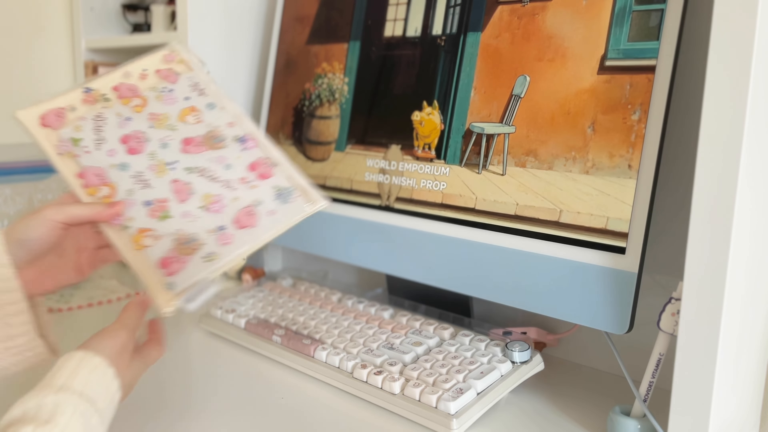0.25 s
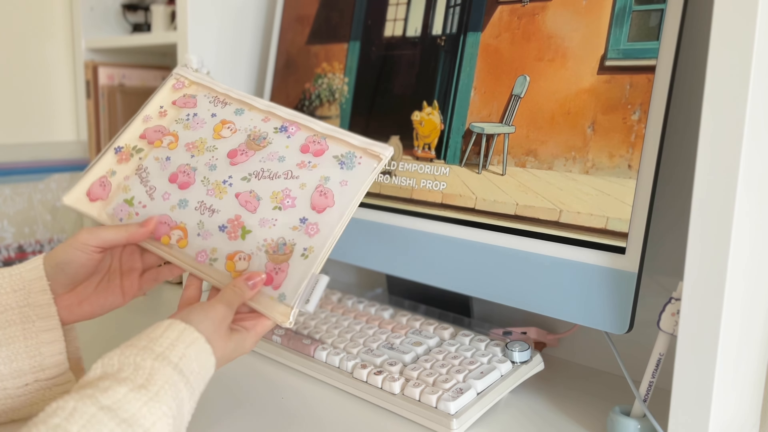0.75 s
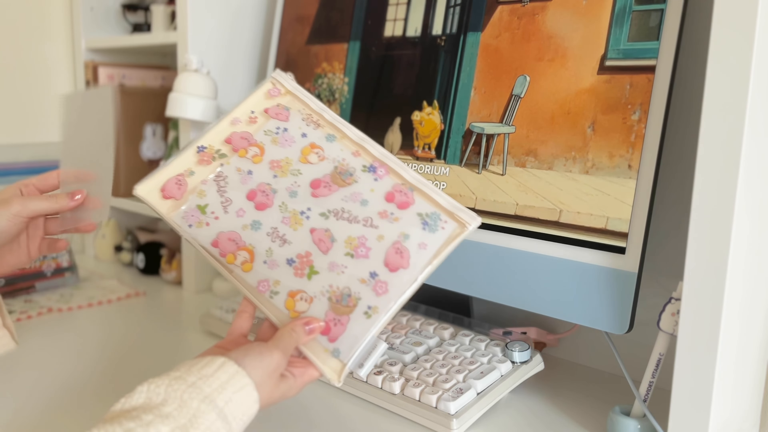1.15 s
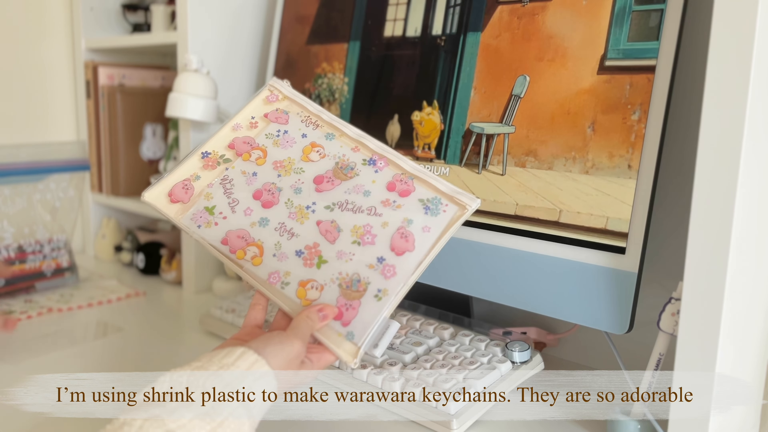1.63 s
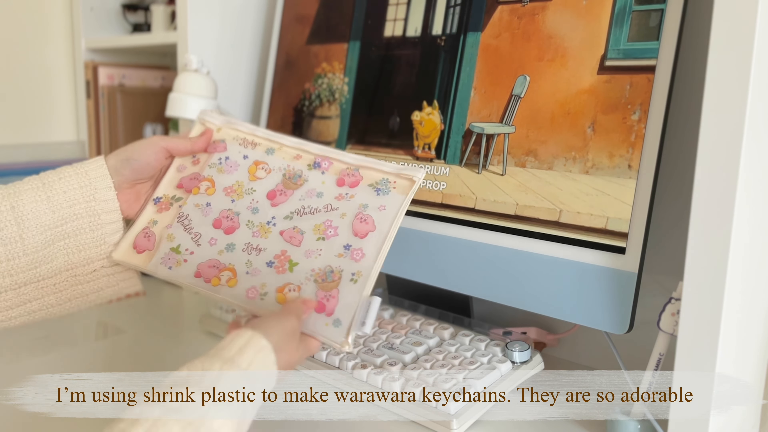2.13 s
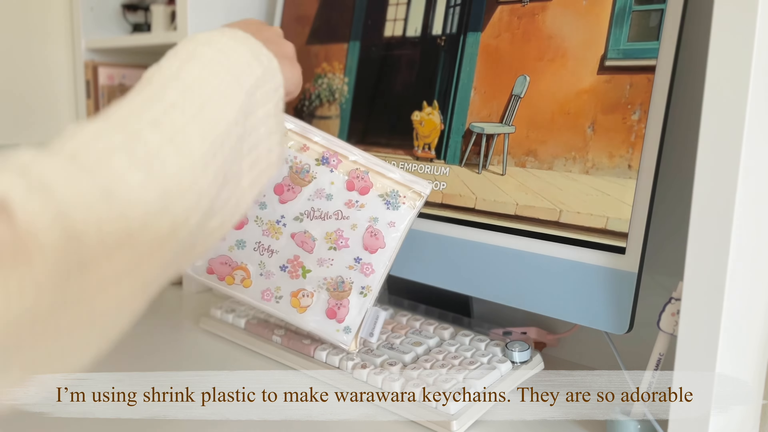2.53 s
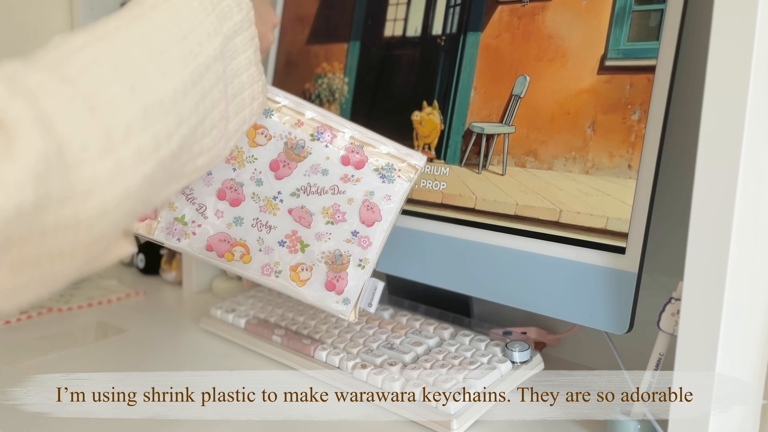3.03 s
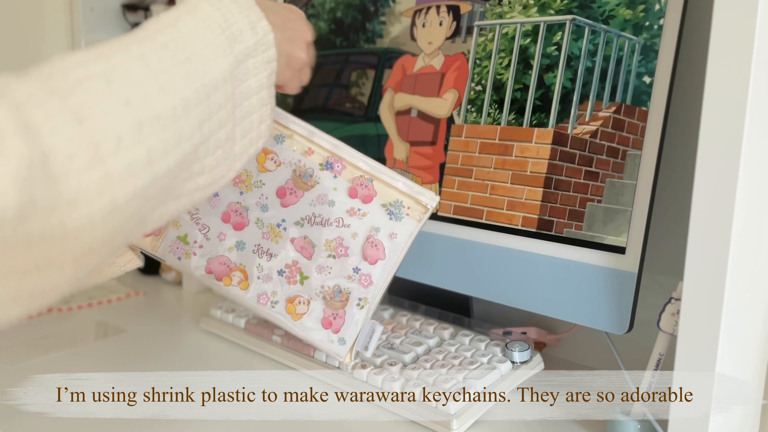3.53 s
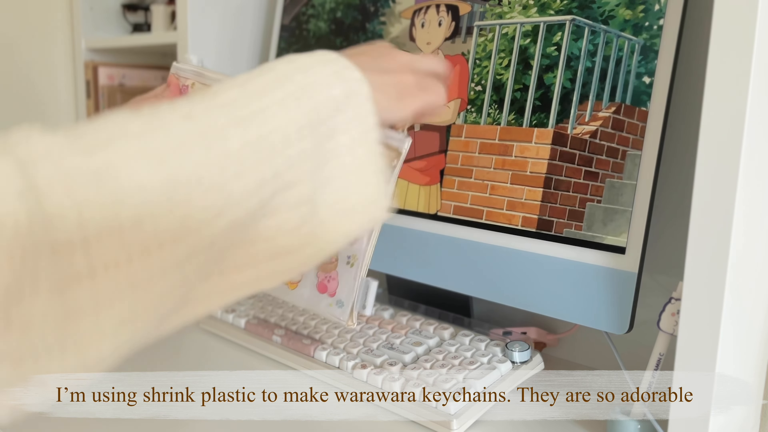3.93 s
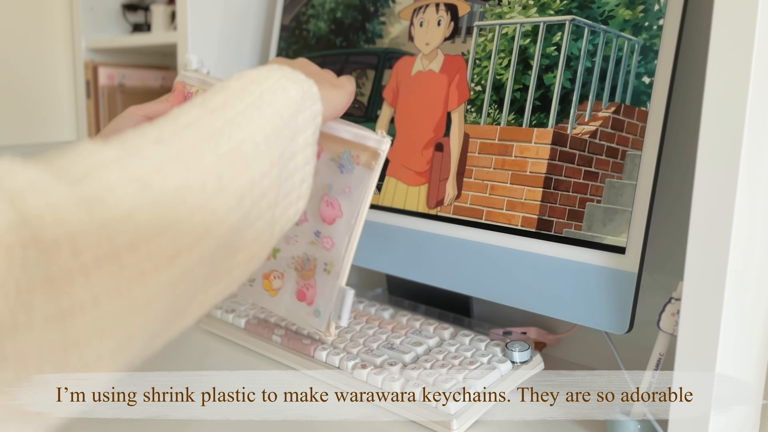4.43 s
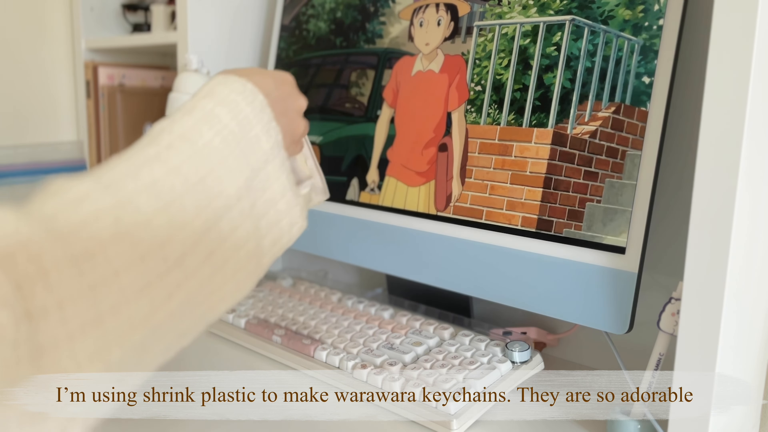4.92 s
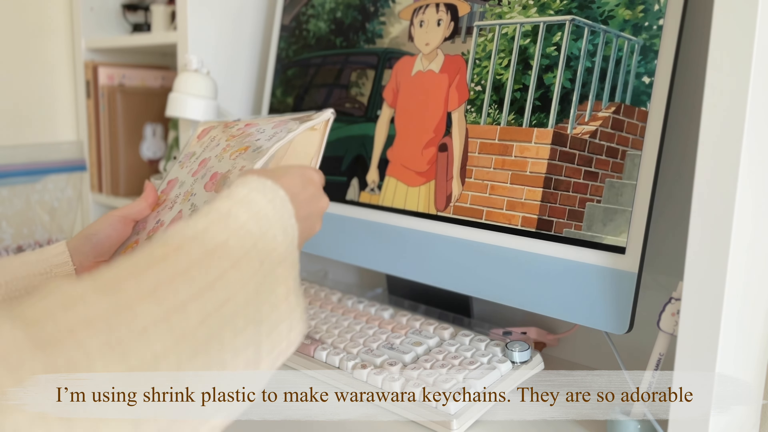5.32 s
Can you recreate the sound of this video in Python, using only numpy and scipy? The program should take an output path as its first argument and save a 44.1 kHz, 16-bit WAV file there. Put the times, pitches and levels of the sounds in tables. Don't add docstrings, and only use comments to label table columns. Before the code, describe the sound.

Crackly plastic film is turned and flexed, a dull desk knock lands, a quick zip rips, and rustling continues over faint room hum.

```python
import sys
import numpy as np
from scipy import signal
from scipy.fft import rfft, irfft, next_fast_len
from scipy.io import wavfile
from scipy.ndimage import uniform_filter1d, map_coordinates

SR = 44100
rng = np.random.default_rng(int(sys.argv[2]) if len(sys.argv) > 2 else 0)


def to_linear_factor(level_db):
    exponent = np.asarray(level_db, float) / 20
    return 10 ** exponent


def int16_out(signal):
    q = np.round(np.clip(np.atleast_2d(signal).T, -1, 1) * 32767)
    wavfile.write(sys.argv[1], SR, q.astype(np.int16))


N = 245637

# (frequency [Hz], level [dB])
FILM_SPECTRUM = [(1100, -120), (1500, -6.5), (2000, -2), (3200, -1.5), (4300, -3.5), (5300, -2),
                 (7000, -2.5), (8000, -7), (9500, -120)]
# (frequency [Hz], level [dB])
AIRY_SPECTRUM = [(6000, -120), (7000, -14), (8300, -3), (10000, 0), (12000, -2), (14000, -3), (15600, -7),
                 (17000, -40)]
# (frequency [Hz], level [dB])
BODY_SPECTRUM = [(300, -120), (420, 0.5), (700, -0.5), (1050, 3), (1500, 3), (2000, -8.5), (3000, -22),
                 (4500, -120)]


def film():
    # (start [s], swell [s], fade per 20 dB [s], peak level [dB], airy top re peak [dB])
    slides = [(0.0, 0.0039, 0.34, -64.5, -11), (.15, 0.28, 3.5, -75, -7), (.46, 0.02, 0.13, -63, -13),
              (.53, 0.28, 0.26, -54, -5.5), (.84, 0.12, 0.1, -64, 6), (.985, 0.029, 0.05, -57, 6),
              (1.1, 0.05, 0.17, -75.5, 0.5), (1.44, 0.042, 0.1141, -40, -9), (1.85, 0.092, 1, -84, -9.5),
              (1.997, 0.0053, 0.094, -51.5, -10.5), (2.04, 0.052, 0.11, -47, -11),
              (2.12, 0.046, 0.0843, -54, -5.5), (2.25, .01, 0.08, -62, -7),
              (2.385, 0.029, 0.1, -61.5, -9.5), (2.595, 0.048, 0.26, -73, -12), (2.72, 0.1, 0, -69.5, -7),
              (3.003, 0.0066, 0.1, -75.5, -5),
              (3.335, 0.04, 0.08, -62.5, -12), (3.7, 0.091, 0.08, -63, -15),
               (3.902, 0.018, 0.11, -52, -16.5), (3.97, 0.054, 0.13, -62, -10.5),
               (4.14, 0.017, -0.2, -69, -18), (4.221, 0.062, 0.1, -53, -14.5),
               (4.479, 0.25, .09, -52, -8.5), (4.8, 0.016, 0.05, -54, -2), (4.931, 0.016, 0.38, -50.5, -11),
               (5.07, 0.0076, 0.18, -48, -12), (5.26, 0.22, -1, -59.5, -9), (5.51, 0.038, -6, -41, -8)]
    # (start [s], swell [s], fade per 20 dB [s], flap level [dB], body re flap [dB])
    flexes = [(0.0, 0.0047, 1, -71.5, 4), (.3, 0.14, 0.4, -68, -2.5), (.47, 0.028, 0.1, -63, 1.5),
              (.6, 0.15, 0.19, -67, 5.5), (.99, 0.024, .5, -67, -24), (1.435, 0.033, 0.08, -41, -12),
              (1.99, 0.0066, 0.5, -63, -0.5), (2.05, 0.059, 0.19, -67, 9.5),
              (2.355, 0.016, 0.1656, -42.5, -6.5), (2.62, 0.19, 0.24, -82, 11.5),
              (3.005, 0.0056, -0.03, -54.5, -7), (3.34, 0.029, 0.4, -58.5, 0.5),
              (3.475, 0.051, 0.32, -52, 1.5), (3.6, 0.17, 0.2, -66.5, 8), (3.97, 0.055, 0.13, -66, 2.5),
              (4.14, 0.011, 0.1, -75, 12), (4.22, .03, 0.3, -61, 0.5), (4.47, 0.22, 0.65, -63.5, 4),
              (4.55, 0.012, 0.1, -57, -3), (4.8, 0.017, 0.03, -60.5, 7), (4.93, 0.026, 0.2, -50.5, -7),
              (5.0, 0.053, 0.26, -68, 12), (5.25, 0.069, 0.5, -62, -0.5), (5.51, 0.044, -0.5, -65.5, 13.5)]
    # (frequency [Hz], level [dB])
    flap_spectrum = [(50, -120), (90, -4.5), (130, 0), (250, -1), (400, -7.5), (550, -120)]
    slide_db, airy_db = strokes(slides, rest_db=[-99, -111], steeper=1.09)
    flap_db, body_db = strokes(flexes, rest_db=[-83.5, -79], steeper=1.21)

    slips = (rng.random(N) < 60 / SR) * rng.exponential(1.6, N)
    fading = signal.lfilter([1], [1, -np.exp(-1 / (0.007 * SR))], slips)
    surge = to_linear_factor(2.85 * wobble(35)) * np.sqrt(1 + fading)
    rub = surge * rng.standard_normal((2, N))
    buckles = crackle(count=3000, centre_hz=4480, spread=0.7, cycles=1.9, scatter_db=2.8)
    grit = unit(rub) + 0.51 * scattered(buckles)

    hiss = to_linear_factor(slide_db - 4) * coloured(patchy(grit, depth_db=1.5), FILM_SPECTRUM)
    airy = to_linear_factor(airy_db + 3) * coloured(grit, AIRY_SPECTRUM)
    body_gain = np.hypot(to_linear_factor(body_db + 3.5), to_linear_factor(slide_db - 14))
    body = body_gain * coloured(rub, BODY_SPECTRUM)
    flutter = to_linear_factor(3.65 * wobble(25)) * rng.standard_normal((2, N))
    flap = to_linear_factor(flap_db - 3) * coloured(flutter, flap_spectrum)
    return hiss + airy + body + flap


def strokes(rows, rest_db, steeper):
    touch_s, swell_db = 0.028, 7.5
    t = np.arange(0, N + 32, 32) / SR
    power = to_linear_factor(2 * np.array(rest_db))[:, None] * np.ones(len(t))
    for s, swell, fade, db, other_db in rows:
        corners = np.cumsum([s - touch_s, touch_s, abs(swell), 4 * abs(fade)])
        shape_db = np.interp(t, corners, [-80, -swell_db, 0, -80])
        power = power + to_linear_factor(2 * np.array([db + shape_db, db + other_db + steeper * shape_db]))
    return [np.interp(np.arange(N) / SR, t, 10 * np.log10(p)) for p in power]


def crackle(count, centre_hz, spread, cycles, scatter_db):
    draw = rng.random((count, 2))
    hz = centre_hz * np.exp(spread * rng.standard_normal(count))
    hz = np.clip(hz, 300, 15000)[:, None]
    t = np.arange(300) / SR
    size = to_linear_factor(-scatter_db * np.log(draw[:, :1] + 1e-4))
    rings = size * np.sin(2 * np.pi * hz * t) * np.exp(-t * hz / cycles)
    at = (draw[:, 1:] * N).astype(int) + np.arange(len(t))
    return unit(np.bincount(at.ravel(), rings.ravel(), N + len(t))[:N])


def patchy(x, depth_db):
    z = signal.stft(x, nperseg=256)[2]
    field = uniform_filter1d(rng.standard_normal(z.shape[1:]), size=4, axis=0)
    field = uniform_filter1d(field, size=14, axis=1)
    return signal.istft(z * to_linear_factor(depth_db * unit(field)), nperseg=256)[1][:, :N]


def snaps():
    # (time [s], peak level [dB], ring frequency [Hz])
    crisp = [(.0608, -43.5, 2460), (.1446, -49, 2910), (.16, -45.5, 1940), (.301, -47.5, 1760),
             (.4815, -38.5, 2500), (.5781, -49, 2720), (.955, -47, 6250), (.989, -39, 6640),
             (1.4703, -24, 2460), (1.4897, -29, 3760), (1.9949, -45.5, 1930), (2.0772, -39, 2600),
             (3.76, -37, 1932), (4.5946, -46, 4910), (4.6242, -34, 2900), (4.7087, -32.5, 2800),
             (5.0788, -31.5, 2420), (5.0922, -30.5, 1760), (5.1217, -38.5, 2510), (5.5066, -38, 1800)]
    # (time [s], peak level [dB], ring frequency [Hz])
    soft = [(1.6557, -46, 2410), (1.8945, -50.5, 3270), (2.0182, -38.5, 3330), (2.0512, -41, 1820),
            (2.1265, -32, 2530), (2.2564, -32, 4980), (2.3014, -48.5, 2700), (2.597, -47.5, 2620),
            (2.7008, -51.5, 1920), (3.8753, -43, 3270), (3.9085, -39.5, 3250), (4.2163, -52, 2950),
            (4.2386, -37, 1950), (4.0147, -37, 1960), (4.449, -40.5, 3030), (4.4936, -36.5, 2645),
            (4.8427, -42.5, 1960), (5.2654, -39, 2280), (5.276, -42.5, 2100), (5.5487, -34, 2750)]
    # (time [s], peak level [dB], ring frequency [Hz])
    seam = [(.4339, -43.5, 2370), (1.4199, -37, 2200), (1.4371, -37, 1760), (1.4462, -36, 1760),
            (2.0647, -34, 2620), (2.3575, -34.5, 2390), (2.627, -47.5, 1970), (2.786, -48.5, 2220),
            (3.336, -43, 2380), (3.3538, -42, 1680), (4.8124, -40.5, 2920), (4.9293, -44, 2425),
            (5.036, -41, 2250), (5.3988, -43, 2520)]
    # (time [s], peak level [dB], ring frequency [Hz])
    padded = [(2.1044, -31, 1940), (2.3813, -25, 1960), (2.4353, -41.5, 1880), (2.739, -53, 1760),
              (2.9297, -59, 1860), (3.0147, -42, 1820), (3.2894, -58, 1900), (4.1365, -59, 1810),
              (4.15, -41.5, 2580), (4.4, -63, 2300), (4.552, -34.5, 1760)]
    # (time [s], peak level [dB], ring frequency [Hz])
    settling = [(.005, -54, 2700), (.2174, -59, 1860), (.3909, -61, 2420), (.789, -50, 2700),
                (1.075, -56, 2900), (1.1814, -58, 2700), (2.146, -44, 5500), (2.162, -46, 4500),
                (2.178, -44, 2000), (2.33, -54, 3500), (2.5486, -62, 3690), (2.618, -50, 6260),
                (2.6444, -53, 3000), (2.6718, -54, 5500), (2.8414, -61, 4000), (3.2214, -70, 1690),
                (3.8294, -55, 3700), (3.9292, -45, 3220), (3.98, -50, 3800), (4.4104, -56, 1856),
                (4.457, -52, 5300), (4.4872, -43, 1900), (4.5054, -39, 2600), (4.5393, -41, 5200),
                (4.6974, -40, 2570), (4.7424, -41, 2800), (4.8054, -42, 6000), (4.945, -45, 5500)]
    # (creases, airy top [dB], body [dB], t60 at 2500 Hz [s])
    kinds = [(crisp, -9.5, -23, 0.02), (soft, -23.5, -22, 0.019), (seam, -14, -1.1, 0.019),
             (padded, -35, 0.84, 0.019), (settling, -16, -11, 0.016)]

    crack, airy, body = np.zeros((3, N + SR))
    t = np.arange(SR // 16) / SR
    for creases, airy_db, body_db, t60 in kinds:
        for s, db, hz in creases:
            decay_db = 60 * t / t60 * (hz / 2500) ** 0.52
            fade = to_linear_factor(db - decay_db) * (1 - np.exp(-t / 0.00044))
            burst = rng.standard_normal((3, len(t)))
            ring = 0.7 * np.sin(2 * np.pi * hz * t + 0.3 * np.cumsum(burst[2]))
            onset = 0.58 + 0.99 * np.exp(-t / 0.00049)
            at = slice(round(s * SR), round(s * SR) + len(t))
            crack[at] += fade * (0.96 * ring + onset * to_linear_factor(0.56 * (airy_db + 12)) * burst[0])
            airy[at] += fade * to_linear_factor(airy_db) * burst[0]
            body[at] += fade * to_linear_factor(body_db) * burst[1]

    def shaped(x, spectrum, gain_db):
        return filtered(x[:N], lambda hz: to_linear_factor(gain_db + along(spectrum, hz)))

    return shaped(crack, FILM_SPECTRUM, 0.2) + shaped(airy, AIRY_SPECTRUM, 9) + shaped(body, BODY_SPECTRUM, 5)


def zip_pull():
    # (time [s], tooth rate [1/s], level [dB])
    short_pull = [
        (3.35, 202, -96),
        (3.358, 207, -50.5),
        (3.406, 170, -48.5),
        (3.42, 144, -93),
    ]
    # (time [s], tooth rate [1/s], level [dB])
    long_pull = [
        (3.476, 500, -93),
        (3.484, 500, -56),
        (3.55, 880, -44),
        (3.603, 904.5, -42),
        (3.628, 1035, -40),
        (3.648, 1073, -34),
        (3.697, 854.4, -35),
        (3.745, 812, -51),
        (3.86, 800, -75),
    ]
    # (time [s], peak level [dB])
    first_teeth = [(3.4798, -44), (3.488, -50), (3.495, -47), (3.5002, -44), (3.507, -48), (3.514, -43),
                   (3.521, -47), (3.5262, -41), (3.531, -41), (3.5351, -39), (3.539, -40), (3.543, -40)]
    # (frequency [Hz], width [Hz], level [dB])
    slider = [(550, 280, -3.5), (950, 370, 2), (1710, 50, 13), (2000, 450, 3), (3250, 500, 0),
              (4100, 220, -4), (5300, 1700, -10), (11000, 8300, -14)]
    rate, level_db = curves(short_pull + long_pull + [(3.88, 800, -99)])

    trembling = 1 + 0.015 * wobble(70)
    at = np.flatnonzero(np.diff(np.floor(np.cumsum(rate * trembling) / SR)))
    draw = rng.standard_normal((2, N))
    weakness_db = np.clip(-1.6 * (level_db[at] + 36), 0, 11)
    uneven = (0.012 + 12 / rate[at]) * to_linear_factor(weakness_db)
    moved = np.clip(at + uneven * draw[0, at] * SR / rate[at], 0, N - 2)
    size = to_linear_factor(1.9 * draw[1, at]) * np.sqrt(SR / rate[at])
    whole, part = moved.astype(int), moved % 1
    ticks = np.bincount(whole, size * (1 - part), N) + np.bincount(whole + 1, size * part, N)

    scrape_db = -0.5 - 1.36 * (level_db + 44.5)
    scrape = to_linear_factor(np.minimum(scrape_db, 0)) * rng.standard_normal(N)
    pull_tab = filtered(ticks + scrape, resonances(slider[:4]))
    teeth = filtered(ticks + 1.5 * scrape, resonances(slider[4:]))
    teeth = teeth * (rate / 1000) ** 0.9
    buzz = unit(patchy((pull_tab + teeth)[None], depth_db=1.2)[0])

    first_s, first_db = np.transpose(first_teeth)
    single = np.bincount((first_s * SR).astype(int), to_linear_factor(first_db + 7), N)
    low_ticks = filtered(to_linear_factor(9) * single, resonances(slider[:5]))
    high_ticks = filtered(single, resonances(slider[5:]))
    return to_linear_factor(level_db + wobble(60)) * buzz + low_ticks + high_ticks


def knocks():
    # (time [s], level [dB], contact time [s])
    blows = [
        (2.359, -21.5, 0.005),
        (2.382, -29.5, 0.0026),
        (1.452, -42.5, 0.0053),
    ]
    # (frequency [Hz], level [dB], t60 [s])
    modes = [(129.1, -15, 0.45), (242, -9.5, 0.16), (429, -14.5, 0.18), (540, 3, 0.15), (614, 3.5, 0.064),
             (670, -9.5, 0.099), (755, -9.5, 0.13), (880, -10.5, 0.068), (1049, -7.5, 0.073),
             (1276, -17, 0.072), (1760, -16.5, 0.068), (2870, -37, 0.17)]
    desk, t = np.zeros(N + SR), np.arange(SR // 2) / SR
    for s, db, contact in blows:
        ring = np.zeros(len(t))
        for hz, level, t60 in modes:
            waver = 0.011 * np.cumsum(rng.standard_normal(len(t)))
            ring += to_linear_factor(level - 60 * t / t60) * np.sin(2 * np.pi * hz * t + waver)
        dull_noise = signal.lfilter([0.1], [1, -0.9], rng.standard_normal(len(t)))
        rattle = dull_noise * to_linear_factor(-9.5 - 60 * t / 0.072)
        desk[round(s * SR):][:len(t)] += to_linear_factor(db) * (ring + rattle) * (1 - np.exp(-t / np.abs(contact)))
    return desk[:N]


def taps():
    # (time [s], peak level [dB], ring frequency [Hz], t60 [s])
    fingertips = [(0.493, -49, 1167, 0.038), (0.703, -47, 1050, 0.03), (.702, -49, 600, .025),
                  (0.828, -51, 1084, 0.05), (2.957, -44.5, 717, 0.013), (3.016, -51.5, 1890, 0.044),
                  (3.025, -64, 2197, 0.12), (3.035, -63, 1755, 0.13), (1.505, -52, 3060, .2),
                  (3.355, -46, 627, 0.031), (4.15, -46, 635, 0.022), (4.552, -44.5, 1107, 0.029),
                  (4.655, -49, 760, 0.06), (4.661, -44, 800, .04), (4.667, -41, 747, 0.035),
                  (4.66, -50, 1900, .05), (4.928, -47, 1074, 0.03), (4.933, -51, 550, .06),
                  (4.972, -43.5, 732, 0.068), (4.985, -44.5, 491, 0.067), (5.03, -55, 755, 0.046),
                  (5.05, -49.5, 750, .05), (5.506, -42.5, 757, 0.028)]
    # (time [s], peak level [dB], ring frequency [Hz], t60 [s])
    wrist = [
        (4.932, -42.5, 90, 0.19),
        (4.935, -48.5, 180, 0.13),
        (4.988, -41.5, 183, 0.043),
        (5.015, -45, 150, 0.07),
        (1.452, -45.5, 125, 0.234),
        (1.453, -30, 370, 0.034),
    ]
    out, t = np.zeros(N + SR), np.arange(SR // 3) / SR
    for s, db, hz, t60 in fingertips + wrist:
        drift = min(hz, 800) / 7500 * np.cumsum(rng.standard_normal(len(t)))
        rise = 1 - np.exp(-t * hz / 0.93)
        fade = to_linear_factor(db + 6 - 60 * t / np.abs(t60))
        out[round(s * SR):][:len(t)] += fade * rise * np.sin(2 * np.pi * hz * t + drift)
    return out[:N]


def scattered(x):
    echo = rng.standard_normal(400) * to_linear_factor(-60 * np.arange(400) / SR / 0.0084)
    return np.array([x, signal.fftconvolve(x, echo / np.linalg.norm(echo))[:N]])


def reflections(x):
    # (frequency [Hz], t60 [s])
    decay = [(100, 0.33), (600, 0.34), (3000, 0.23), (12000, 0.029)]
    hz, t, z = signal.stft(rng.standard_normal((2, SR // 2)), SR, nperseg=256)
    tail = signal.istft(z * to_linear_factor(-60 * t / along(decay, hz)[:, None]), SR, nperseg=256)[1]
    return signal.fftconvolve(x[None], tail / np.linalg.norm(tail[0]), axes=1)[:, :N]


def room_tone():
    # (frequency [Hz], level per Hz [dB])
    air_spectrum = [(20, -13.5), (45, -3.5), (110, -7.5), (170, -18.5), (300, -21), (700, -25),
                    (1100, -25.5), (1700, -46.5), (3000, -49), (6000, -53), (12000, -55), (16000, -67)]
    # (frequency [Hz], width [Hz], level [dB])
    room_modes = [(51, 12, -6.5), (62, 5.8, -6.5)]
    t = np.arange(N) / SR
    hum = to_linear_factor(-60.5 + 0.29 * wobble(2.6)) * np.sin(2 * np.pi * 120 * t + 0.15 * wobble(4.4))
    boom = filtered(rng.standard_normal((2, N)), resonances(room_modes))
    boom = filtered(boom, resonances([(55.6, 82, 0)]))
    air = to_linear_factor(0.53 * wobble(7.8)) * coloured(rng.standard_normal((2, N)), air_spectrum)
    whine = unit(filtered(rng.standard_normal(N), resonances([(970, 14, 0)])))
    return hum + to_linear_factor(-82) * whine + to_linear_factor(-60.5) * unit(boom) + to_linear_factor(-63) * air


def unit(x):
    return x / np.sqrt(np.mean(x ** 2) + 1e-20)


def along(points, hz):
    f, v = np.transpose(points)
    return np.interp(np.log(hz + 1), np.log(f + 1), v)


def curves(rows):
    s, *cols = np.transpose(rows)
    return [np.interp(np.arange(N) / SR, s, c) for c in cols]


def wobble(rate):
    return map_coordinates(rng.standard_normal(int(N * rate / SR) + 4), [np.arange(N) * rate / SR])


def filtered(x, response):
    m = next_fast_len(x.shape[-1] + 8192)
    return irfft(rfft(x, m) * response(np.fft.rfftfreq(m, 1 / SR)), m)[..., :x.shape[-1]]


def coloured(x, spectrum):
    return unit(filtered(x, lambda hz: to_linear_factor(along(spectrum, hz))))


def resonances(modes):
    def response(f):
        total = 0
        for k, (centre, width, db) in enumerate(modes):
            damping = 1j * f * width
            total = total + (-1) ** k * to_linear_factor(db) * damping / (centre * centre - f * f + damping)
        return total
    return response


def scene():
    # (frequency [Hz], coherence [0-1])
    alike = [(150, .98), (400, .75), (1000, .5), (1500, .45), (1750, .8), (4800, .5), (7000, .6),
             (8000, .85), (9900, .7), (11500, .85), (13700, .7), (14800, .85)]
    near = film() + scattered(snaps() + zip_pull())
    near = near + np.array([[1], [0.6]]) * scattered(knocks() + taps())
    field = near + to_linear_factor(-11) * reflections(near[0]) + room_tone()

    def split(hz):
        angle = np.arccos(np.clip(along(alike, hz), 0, 1)) / 2
        return np.array([np.cos(angle), np.sin(angle)])

    shared, differing = filtered(field, split)
    return np.array([shared + differing, shared - differing])


def thinned(ports, under_db, sudden_db):
    hz, _, z = signal.stft([ports[0] + ports[1], ports[0] - ports[1]], SR, nperseg=1024)
    power = np.abs(uniform_filter1d(np.abs(z) ** 2, size=16, axis=1))[:, 8::16].repeat(16, axis=1) + 1e-20
    power = np.pad(power, ((0, 0), (0, 1), (0, 0)), "edge")
    treble = np.log10(power[:, hz > 3000].sum((0, 1)))
    sudden = 10 * np.diff(treble, prepend=0) > sudden_db
    weak = (power < to_linear_factor(2 * under_db) * power[::-1]) & (hz[:, None] > 7600) & ~sudden
    mid, side = signal.istft(z * ~weak, SR, nperseg=1024)[1][:, :N]
    return np.array([mid + side, mid - side]) / 2


def low_pass(x):
    return signal.sosfilt(signal.butter(12, 15800, fs=SR, output="sos"), x)


def record(dry):
    # (frequency [Hz], lead [rad])
    lead = [(300, 0), (600, .5), (1100, 1.4), (1450, 2.9), (1560, 2.9), (1700, .5), (4050, 1), (5500, 0),
            (7150, -1.9), (7800, -2.8), (9200, -3.5), (11000, -5.9), (13200, -6.6), (14400, -9),
            (16000, -9.6)]
    # (frequency [Hz], difference [dB])
    tilt = [(150, 0), (400, 3), (1100, 3), (1600, -1), (2200, 7), (5200, 11), (6500, 6), (7700, 0)]
    side = np.array([[0.5], [-0.5]])

    def port_response(hz):
        bass_cut = 1 / (1 + (38 / (hz + 1)) ** 4)
        return bass_cut * to_linear_factor(side * along(tilt, hz)) * np.exp(1j * side * along(lead, hz))

    ports = filtered(dry, port_response)
    mix = thinned(ports, under_db=-5, sudden_db=4.5)
    return low_pass(mix)


dry = scene()
out = record(dry)
int16_out(out)
```